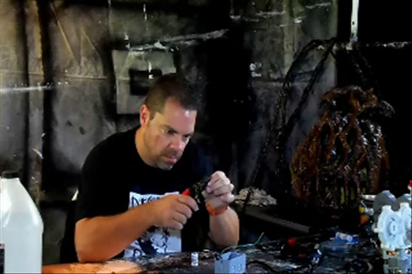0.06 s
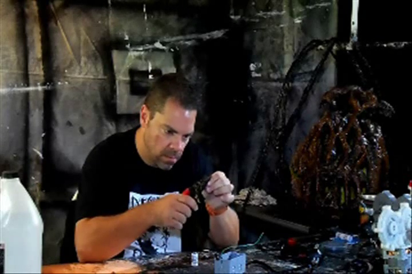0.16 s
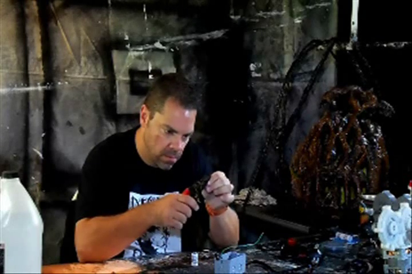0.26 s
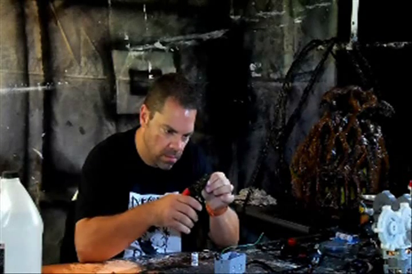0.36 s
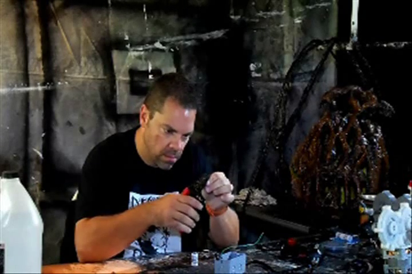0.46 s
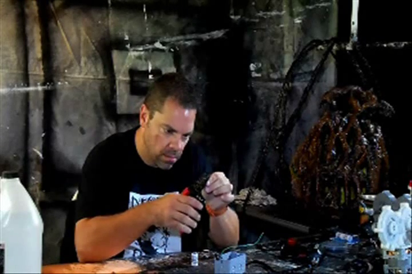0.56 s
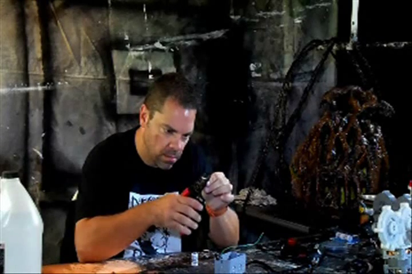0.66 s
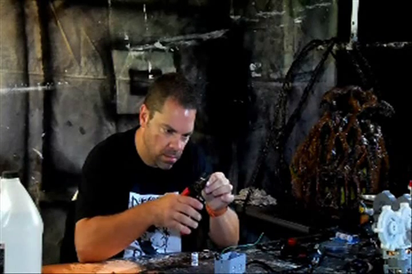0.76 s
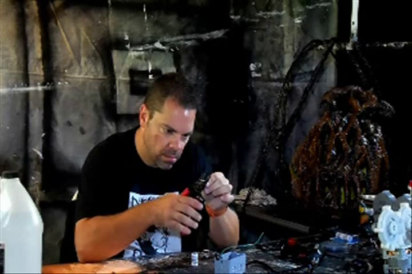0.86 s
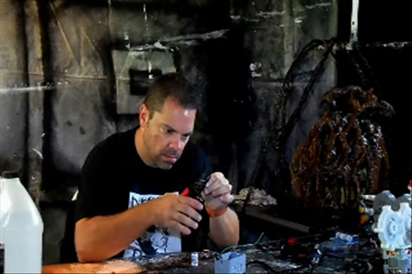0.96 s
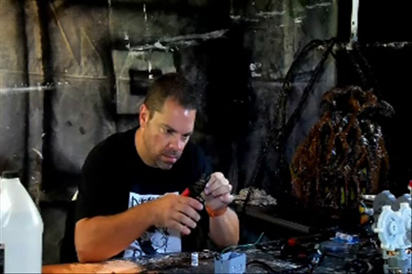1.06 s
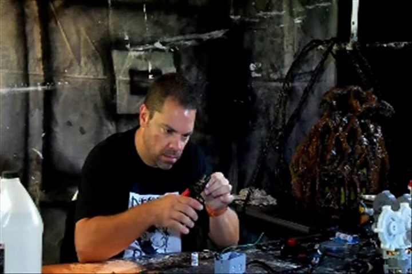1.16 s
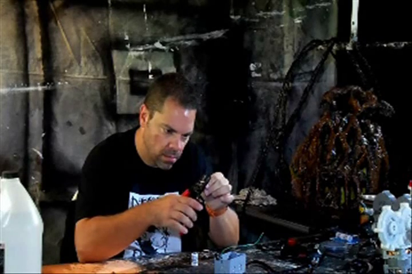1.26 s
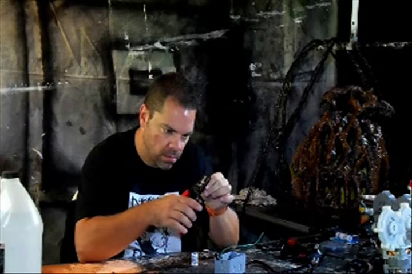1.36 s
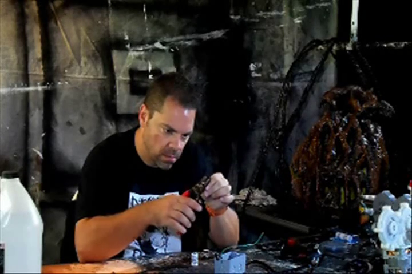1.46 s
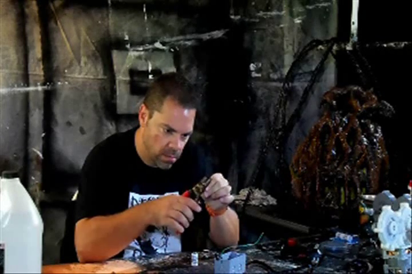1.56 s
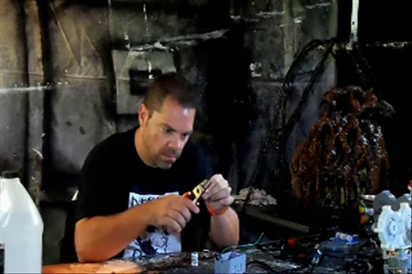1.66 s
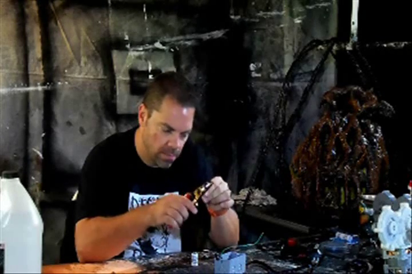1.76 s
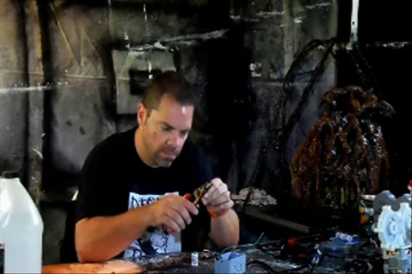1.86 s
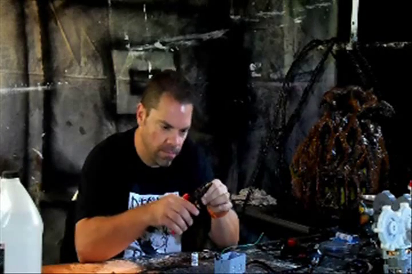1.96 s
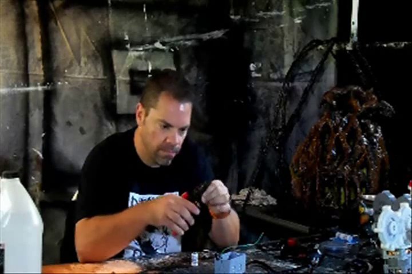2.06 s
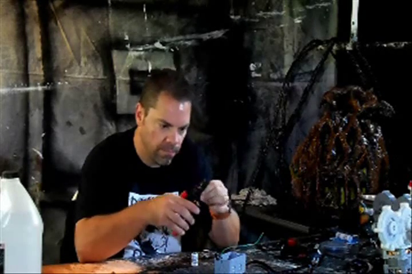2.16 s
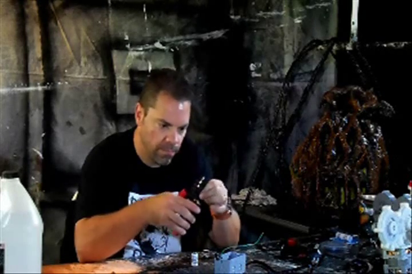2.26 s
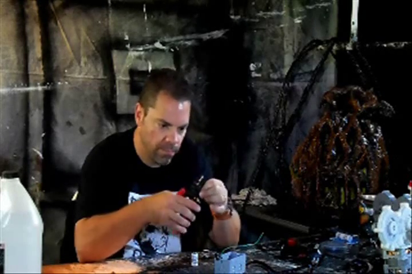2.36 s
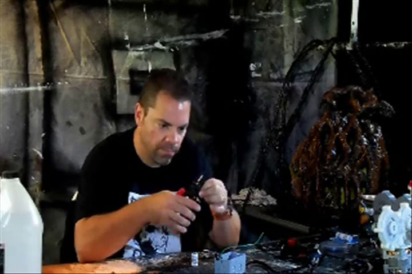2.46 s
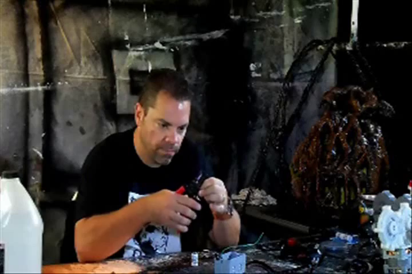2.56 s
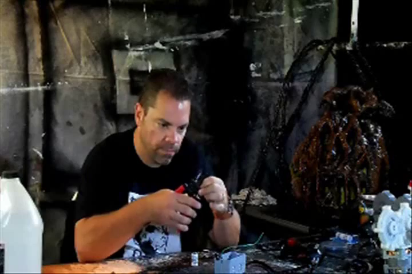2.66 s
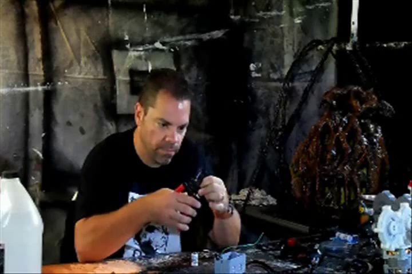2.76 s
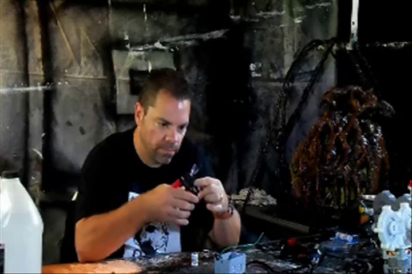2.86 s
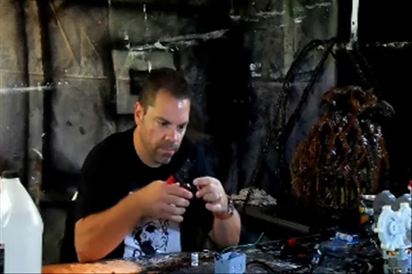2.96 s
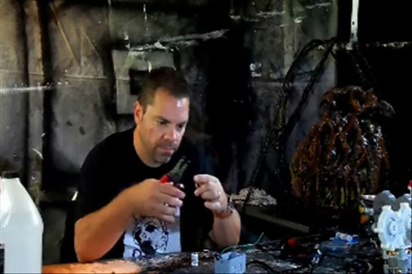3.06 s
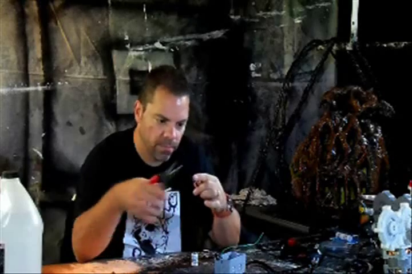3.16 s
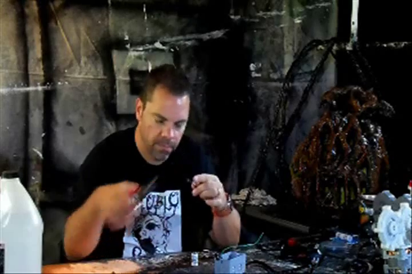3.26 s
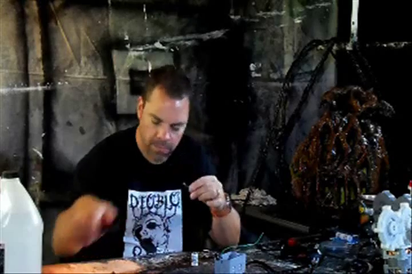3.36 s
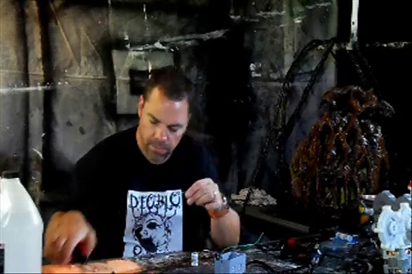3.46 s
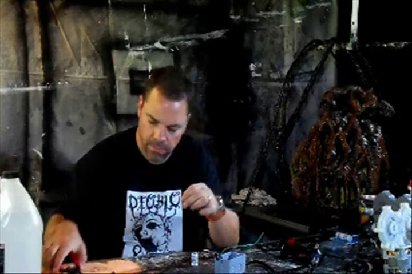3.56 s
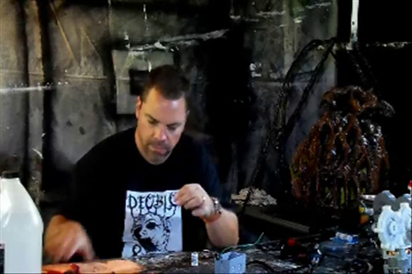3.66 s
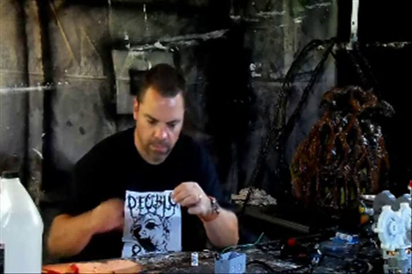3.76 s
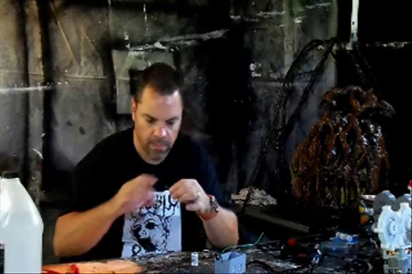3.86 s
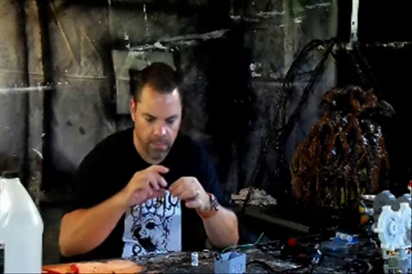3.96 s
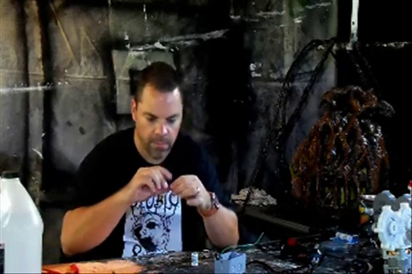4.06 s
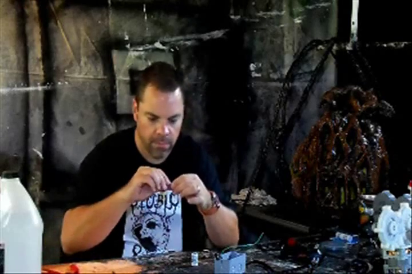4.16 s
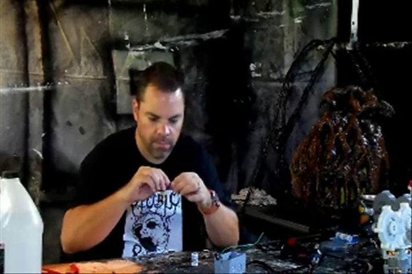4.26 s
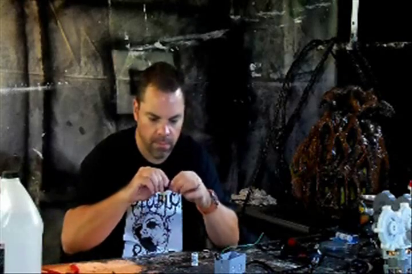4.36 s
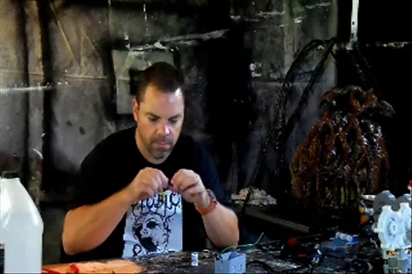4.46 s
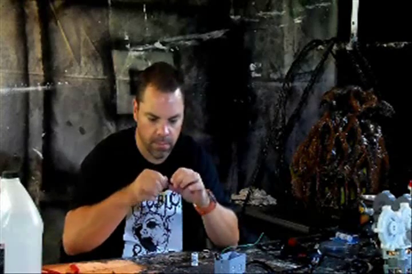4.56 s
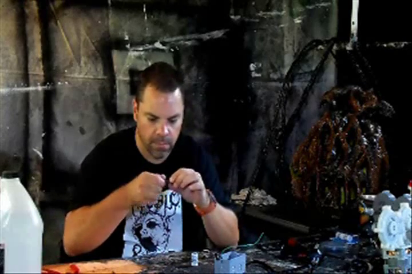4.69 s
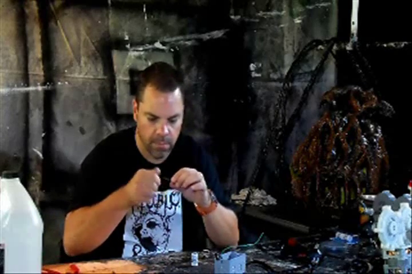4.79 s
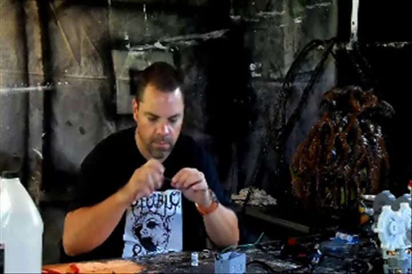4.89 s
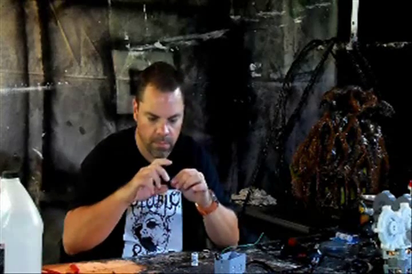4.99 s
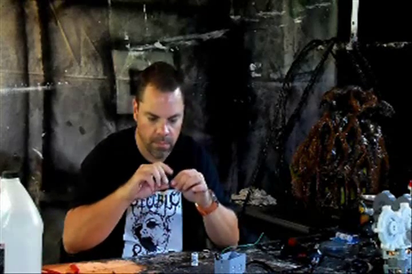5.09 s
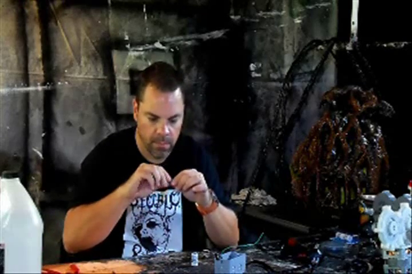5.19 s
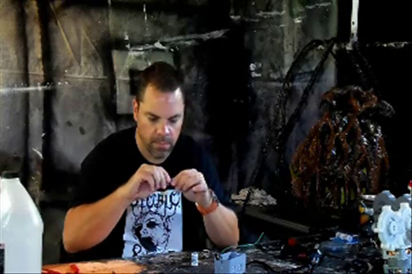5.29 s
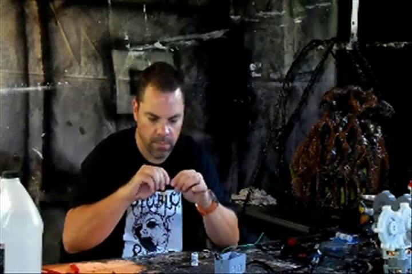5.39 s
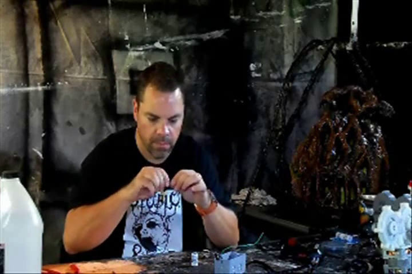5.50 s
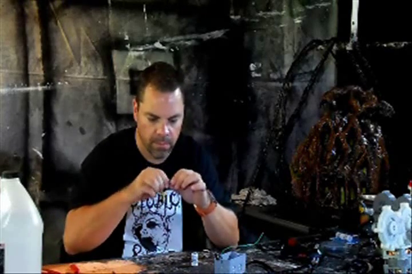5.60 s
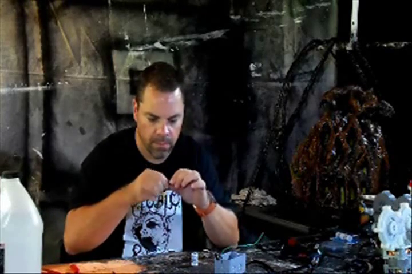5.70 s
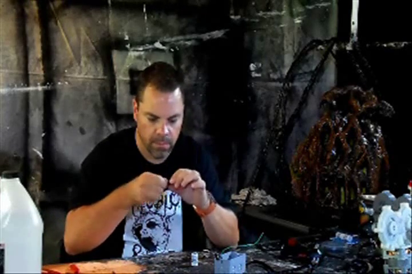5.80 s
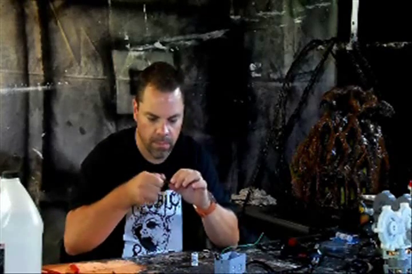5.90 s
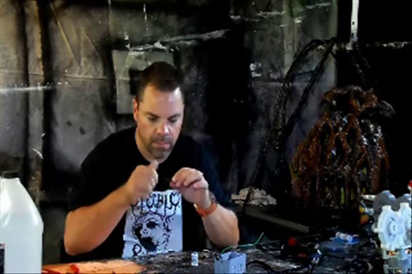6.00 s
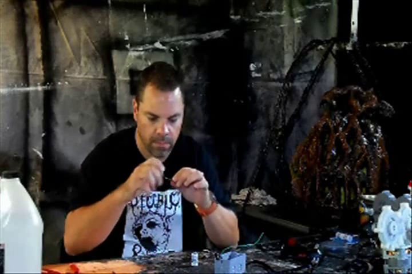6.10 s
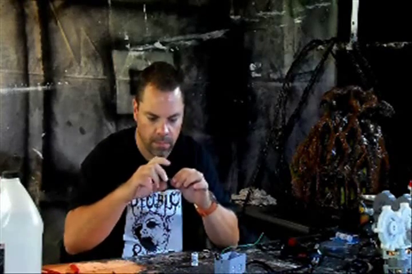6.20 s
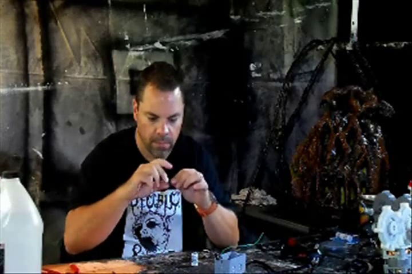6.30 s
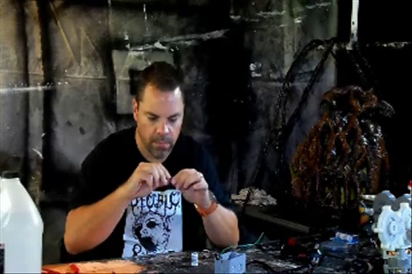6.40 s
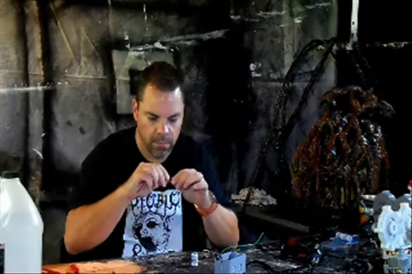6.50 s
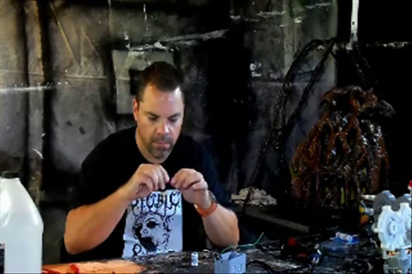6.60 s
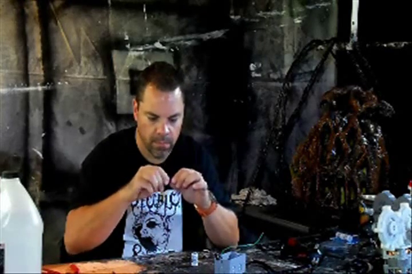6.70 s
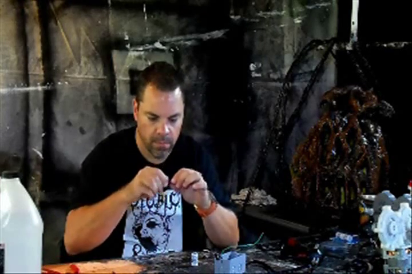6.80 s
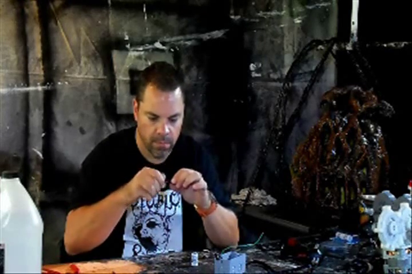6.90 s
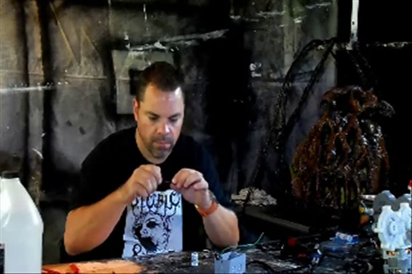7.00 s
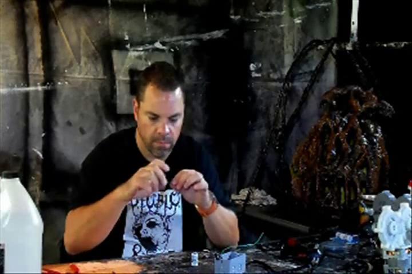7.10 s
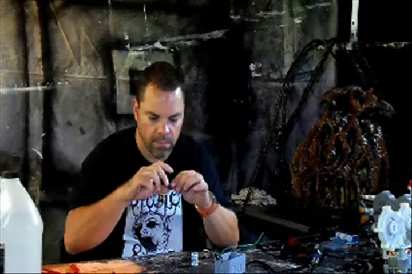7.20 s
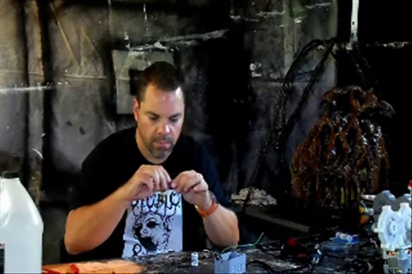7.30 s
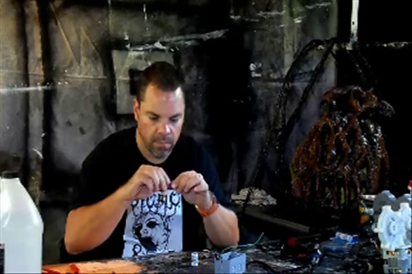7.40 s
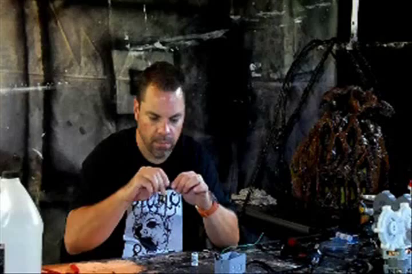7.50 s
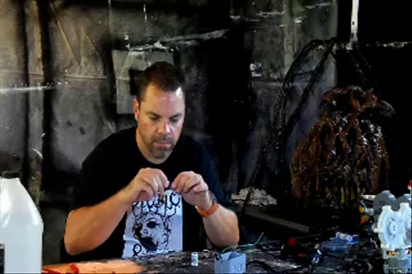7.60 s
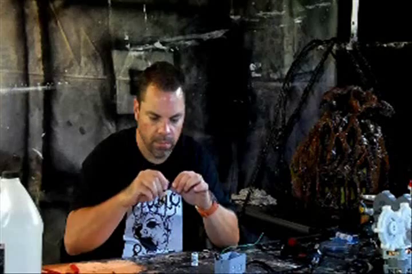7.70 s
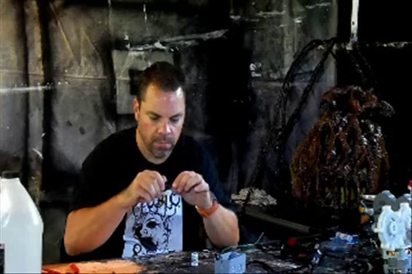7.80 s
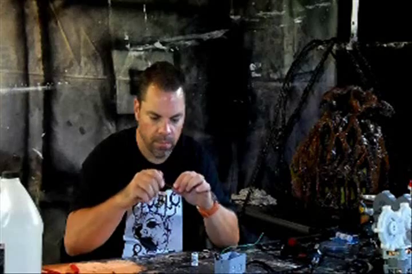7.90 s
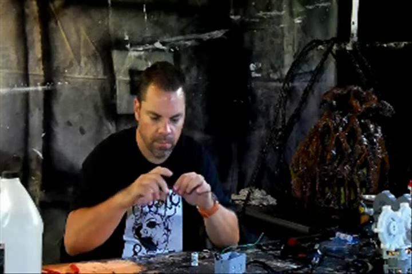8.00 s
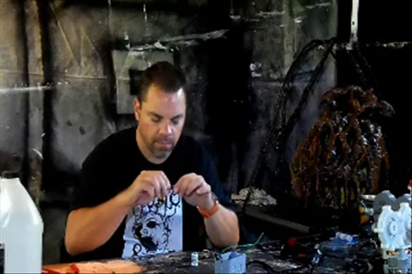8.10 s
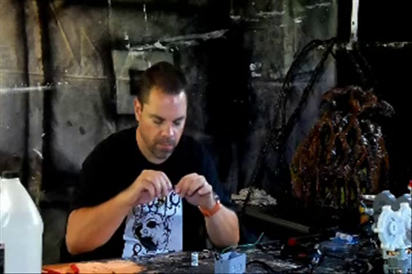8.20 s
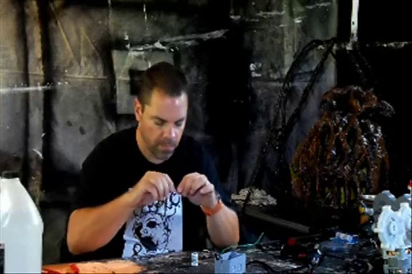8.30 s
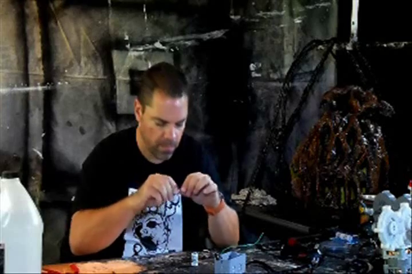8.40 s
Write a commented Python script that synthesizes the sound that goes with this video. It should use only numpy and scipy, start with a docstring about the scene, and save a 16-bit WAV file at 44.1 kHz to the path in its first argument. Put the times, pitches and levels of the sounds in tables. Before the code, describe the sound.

From 0 s a small motor whines steadily, a nasal, slightly unsteady tone near 800 Hz with buzzing overtones and a coarse bearing rasp around 1 to 4 kHz. Beneath lie a low rumble with a rapid 30-per-second throb, even hiss and faint thin high tones. The whine briefly drops away at irregular moments, as at 0.4, 1.9 and 2.4 s. At 3.2 s wire strippers crack shut, very loud, bright and dry with a short room echo and a tiny steel ring; a faint jaw click follows near 3.36 s. The background is pushed down by the snap. From 3.7 to 3.9 s the tool meets a wooden bench: light clicks, a strong clack and hollow thud at 3.8 s, then small settling ticks. Afterwards the motor continues alone, slowly swelling back from about 5.3 to 8 s, with a longer whine dip at 6.1 to 6.5 s, and is still running at the end.

```python
"""From the start a small motor whines and rasps over hiss and a throbbing low rumble: sines and shaped noise.
Now and then, all through, its whine drops away for a moment.
Wire strippers then snap shut as the insulation lets go of a wire: noise bursts with room echo, and ringing jaws.
The snap pushes the recorder's gain down. The tool is put down on a wooden bench with clicks, thuds and ringing
boards, and the background slowly swells back."""
import sys
import numpy as np
from scipy import signal
from scipy.fft import rfft, irfft, next_fast_len
from scipy.io import wavfile
from scipy.ndimage import uniform_filter1d

SR = 44100
rng = np.random.default_rng(int(sys.argv[2]) if len(sys.argv) > 2 else 0)


def transcribe(u):
    """Save the signal u as a 16-bit wav file named by the first command-line argument.

    u: samples, shape (n,) or (channels, n), limited to [-1, 1]; the rate is SR.
    q: integer samples, one column per channel.
    """
    v = np.clip(np.atleast_2d(u).T, -1, 1)
    q = np.round(v * 32767).astype(np.int16)
    wavfile.write(sys.argv[1], SR, q)


N = 372644
TIME = np.arange(N) / SR


def from_db(db):
    """Decibels to gain."""
    return 10 ** (np.asarray(db) / 20)


def rms_one(x):
    """Scale to rms 1."""
    return x / np.sqrt(np.mean(x ** 2) + 1e-20)


def at_hz(points, hz, axis=1):
    """Read one column of a table at any frequency, on a log-frequency axis."""
    points = np.array(points)
    log_hz = np.log(np.maximum(hz, 1))
    return np.interp(log_hz, np.log(points[:, 0]), points[:, axis])


def noise(spectrum, size=N):
    """White noise filtered to the given density in dB per Hz."""
    padded = next_fast_len(size)
    density_db = at_hz(spectrum, np.fft.rfftfreq(padded, 1 / SR))
    gain = from_db(density_db) * np.sqrt(SR / 2)
    return irfft(rfft(rng.standard_normal(padded)) * gain, padded)[:size]


def drift(rate):
    """Smooth random movement of rms 1 that changes about rate times a second."""
    padded = next_fast_len(N)
    gain = 1 / (1 + (np.fft.rfftfreq(padded, 1 / SR) / rate) ** 2)
    return rms_one(irfft(rfft(rng.standard_normal(padded)) * gain, padded)[:N])


def add(track, s, sound):
    """Mix a short sound in at time s."""
    start = round(s * SR)
    track[start:start + len(sound)] += sound[:N - start]


MOTOR_HZ = 798.5
# Base levels: the whine's fundamental (peak) and the bearing rasp (rms)
WHINE_DB, RASP_DB = -39.5, -30.5
# Chance wavering of the whine; the rasp takes only a share of it and of the dips
WAVER_DB, WAVERS_PER_S, RASP_WAVER_SHARE, RASP_DIP_SHARE = 1.2, 9.8, 0.29, 0.18
# Overtones of the whine: multiple of the motor's f, level/dB against WHINE_DB, share of the whine's swings
WHINE_OVERTONES = [(2, -1.7, 0.47), (3, 4, 0.29), (4, 3, 0.81), (8, -14.5, 0.61), (9, -12, 0.75)]
# Slow easing and recovery of the whine: t/s, added level/dB
WHINE_SWELL = [(0, 2.5), (.6, 0.5), (1.0, -2), (2.0, -2), (2.6, .5), (4.0, 0), (6.9, 1), (8.45, -2)]
# Colour of the bearing rasp, only its shape counts: f/Hz, level/dB (per Hz)
RASP_COLOUR = [(850, -26.5), (1230, -7), (1420, -15), (1580, -8), (1660, -13), (1760, -10.5), (2150, -0.5),
               (2380, -1.5), (2560, -13.5), (2750, -10.5), (3100, -8), (3550, -9.5), (3900, -25.5),
               (4600, -47)]


def motor(wobble_hz, jitter_rad, flutter_db):
    """Uneven turns bend one phase shared by whine and overtones; the bearing rasp flutters along with them."""
    speed_hz = MOTOR_HZ + wobble_hz * drift(7.8)
    phase = 2 * np.pi * np.cumsum(speed_hz) / SR + jitter_rad * drift(45)

    flutter = flutter_db * drift(38)
    waver = WAVER_DB * drift(WAVERS_PER_S)
    dip = dips()
    swing_db = np.interp(TIME, *np.transpose(WHINE_SWELL)) + waver - dip

    whine = from_db(WHINE_DB + swing_db + flutter + 2.0 * drift(31)) * np.sin(phase)
    for multiple, db, share in WHINE_OVERTONES:
        level = from_db(WHINE_DB + db + share * swing_db + flutter + 2.15 * drift(21))
        whine += level * np.sin(multiple * phase + rng.uniform(0, 2 * np.pi))

    rasp_db = RASP_DB + RASP_WAVER_SHARE * waver - RASP_DIP_SHARE * dip + flutter
    return whine + from_db(rasp_db) * rms_one(noise(RASP_COLOUR))


THROB_HZ = 30
# Low rumble spectrum: f/Hz, level/dB (per Hz)
RUMBLE_COLOUR = [(12, -62.5), (30, -56.5), (42, -61), (60, -60), (85, -66), (130, -63), (250, -68),
                 (500, -74.5), (700, -70.5), (1000, -76), (3000, -95.5)]
# Even hiss spectrum: f/Hz, level/dB (per Hz)
HISS_COLOUR = [(300, -77), (3000, -88), (4300, -78.5), (4600, -82), (5050, -77.5), (5500, -82),
               (6300, -76.5), (6900, -78.5), (8200, -76.5), (9000, -80.5), (11000, -85), (12300, -82)]
# Faint thin tones: f/Hz, level/dB (rms), wander of f/Hz (rms)
THIN_TONES = [(1194, -66, 1.8), (7850, -61, 3.5), (10000, -68, 1.5)]


def background():
    """Low shaped noise with a fast pulsing throb, even hiss and a few sines that wander in pitch."""
    tones = 0
    for hz, db, wander_hz in THIN_TONES:
        phase = 2 * np.pi * np.cumsum(hz + wander_hz * drift(19.0)) / SR
        tones = tones + from_db(db) * np.sqrt(2) * np.sin(phase)   # root 2 turns rms into peak

    pulses = np.exp(5 * (np.cos(2 * np.pi * THROB_HZ * TIME) - 1))   # narrow bumps of height 1
    throb = from_db(-34.5) * (pulses - pulses.mean()) * (1 + 0.7 * drift(8.2))
    return noise(RUMBLE_COLOUR) + throb + noise(HISS_COLOUR) + tones


DIP_EDGE_S = 0.015   # time it takes to fade and to come back
# Moments when the whine drops away: t/s, length/s, drop in level/dB
WHINE_DIPS = [(0.394, .11, 18), (1.874, 0.06, 12), (2.394, .04, 10), (2.781, 0.078, 11), (3.048, .13, 6),
              (3.36, .09, 8), (3.878, 0.188, 14), (4.836, 0.07, 13), (5.092, 0.13, 17), (5.607, 0.035, 3),
              (6.088, 0.406, 10.5), (7.603, 0.048, 9), (8.27, .2, 4.5)]


def dips():
    """How far the whine has dropped, in dB: a quick fade, a hold, a quick return."""
    drop_db = 0
    for s, length, depth_db in WHINE_DIPS:
        to_nearer_end = np.minimum(TIME - s, s + length - TIME)
        drop_db = drop_db + depth_db * np.clip(to_nearer_end / DIP_EDGE_S + 0.5, 0, 1)
    return drop_db


# Workshop echo: f/Hz, level/dB against the direct sound before each blow's wet_db, t60/s
ROOM_ECHO = [(130, -8, 0.47), (400, -8.5, 0.29), (1000, -4, 0.25), (2200, -7, 0.23), (4300, -12, 0.23),
             (7500, -15, 0.19), (12000, -16, 0.14)]


def blow(colour, t60, wet_db, build_s):
    """A short burst of coloured noise (t60 in s at 2 kHz), then echoes that thicken into a tail."""
    t = TIME[:SR * 2 // 5]
    out = 0
    edges = np.geomspace(60, 14000, 19)
    for low, high in zip(edges, edges[1:]):
        hz = np.sqrt(low * high)
        band_pass = signal.butter(2, [low, high], "band", fs=SR, output="sos")
        band = signal.sosfilt(band_pass, rng.standard_normal(len(t)))

        direct = from_db(-60 * t / t60 * np.sqrt(hz / 2000))   # the treble is over first
        echo_db = wet_db + at_hz(ROOM_ECHO, hz) - 60 * t / at_hz(ROOM_ECHO, hz, axis=2)
        echo = from_db(echo_db) * (1 - np.exp(-t / build_s))
        gain = from_db(at_hz(colour, hz)) * np.sqrt(SR / 2)
        out = out + gain * band * np.hypot(direct, echo)
    return out


def ring(modes, spread_db):
    """One blow sets every mode ringing as a decaying sine, each with a chance strength of its own."""
    t = TIME[:SR // 2]
    out = 0
    for k, (hz, db, t60) in enumerate(modes):
        level_db = db + spread_db * rng.standard_normal() - 60 * t / t60
        out = out + (-1) ** k * from_db(level_db) * np.sin(2 * np.pi * hz * t)   # alternate modes flip sign
    return out


# The jaws let go, rebound, and later spring open: t/s, crack level/dB, ring level/dB (gains on the tables below)
JAW_BLOWS = [(3.2021, 2.5, -9), (3.2036, -14, -11), (3.2092, -18, 0.5), (3.3597, -23, -21),
             (3.369, -33, -9.5)]
# Colour of the crack: f/Hz, level/dB (per Hz)
CRACK_COLOUR = [(130, -63), (300, -51), (600, -46), (1150, -52), (2000, -38), (3100, -41), (4200, -36.5),
                (5600, -42), (8000, -46), (11000, -43.5), (13000, -51)]
# Ringing modes of the jaws: f/Hz, level/dB, t60/s
JAW_MODES = [(1780, -16, .06), (1920, -18, .06), (2260, -10.5, 0.032), (2400, -21, 0.046), (3815, -27, .06),
             (4170, -22, 0.037)]


def strippers():
    """The jaws crack together, rebound and ring briefly in the hand: noise bursts plus steel modes."""
    out = np.zeros(N)
    for s, crack_db, ring_db in JAW_BLOWS:
        add(out, s, from_db(crack_db) * blow(CRACK_COLOUR, t60=0.02, wet_db=-1.5, build_s=0.0049))
        add(out, s, from_db(ring_db) * ring(JAW_MODES, spread_db=3.5))
    return out


STEEL_LIFT_DB = 5.5   # added to every steel click
# The tool meets the bench: t/s, steel click level/dB before the lift, wood level/dB (gains on the tables below)
BENCH_CONTACTS = [(3.6882, -18.5, -19), (3.698, -24, -16), (3.707, -30, -26), (3.7707, -10, -15),
                  (3.7792, -13, -13), (3.786, -20, -16), (3.8005, -13, -14), (3.8045, -5, 5.5),
                  (3.8201, -14.5, -5), (3.8728, -14, -11.5), (3.886, -17.5, -12.5), (3.919, -19, -18)]
# Colour of the steel click: f/Hz, level/dB (per Hz)
CLICK_COLOUR = [(150, -70), (900, -56), (1500, -44.5), (2500, -37), (3600, -46), (5200, -42.5),
                (6500, -45.5), (8500, -45.5), (10500, -56), (12000, -57)]
# Colour of the wooden thud: f/Hz, level/dB (per Hz)
THUD_COLOUR = [(60, -62), (95, -48), (135, -30), (175, -42), (210, -42), (290, -33.5), (400, -38.5),
               (560, -36.5), (680, -45), (1000, -52), (1500, -48), (3000, -64), (8000, -85)]
# Ringing modes of the boards: f/Hz, level/dB, t60/s
BENCH_MODES = [(117, -28, 0.3), (136, -20.5, 0.34), (293, -18, 0.081), (360, -32, 0.21), (423, -29, .11),
               (550, -20, 0.073)]


def bench():
    """The tool touches down, lands and settles; each contact is a steel click, a wood thud and ringing boards."""
    out = np.zeros(N)
    for s, steel_db, wood_db in BENCH_CONTACTS:
        click = blow(CLICK_COLOUR, t60=0.013, wet_db=-2.5, build_s=0.0037)
        thud = blow(THUD_COLOUR, t60=0.025, wet_db=-3.0, build_s=0.008)
        add(out, s, from_db(steel_db + STEEL_LIFT_DB) * click)
        add(out, s, from_db(wood_db) * thud)
        add(out, s, from_db(wood_db) * ring(BENCH_MODES, spread_db=3.5))
    return out


def scene():
    """Everything reaches one microphone."""
    running_motor = motor(wobble_hz=0.89, jitter_rad=0.1, flutter_db=1.39)
    return (running_motor + background() + strippers() + bench())[None]


def gain_control(x, threshold_db, depth_db, hold_s, release_db_per_s, attack_s):
    """A loud peak pulls the gain down a step; it is held, then creeps back."""
    level = np.sqrt(np.abs(uniform_filter1d(x ** 2, size=SR // 250)))   # rms over 4 ms
    last_peak = np.maximum.accumulate(np.where(level > from_db(threshold_db), TIME, -np.inf))
    release_s = TIME - last_peak - hold_s
    cut_db = np.clip(depth_db - release_db_per_s * release_s, 0, depth_db)
    pole = np.exp(-1 / (attack_s * SR))
    smooth_cut_db = signal.lfilter([1 - pole], [1, -pole], cut_db)
    return x * from_db(-smooth_cut_db)


def record(dry):
    """Gain control, overload clipping at full scale, and a steep cut of the top."""
    x = gain_control(dry[0], threshold_db=-12, depth_db=4.0, hold_s=1.52, release_db_per_s=1.64, attack_s=0.015)
    x = np.clip(x, -1, 1)
    low_pass = signal.ellip(12, 0.1, 90, 12600, fs=SR, output="sos")   # cutoff in Hz
    return signal.sosfilt(low_pass, x)[None]


dry = scene()
out = record(dry)
transcribe(out)
```